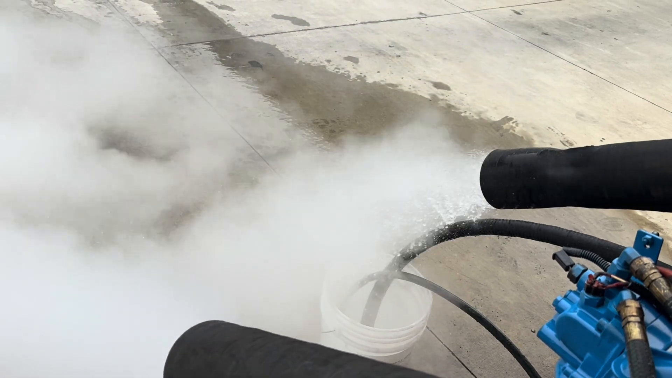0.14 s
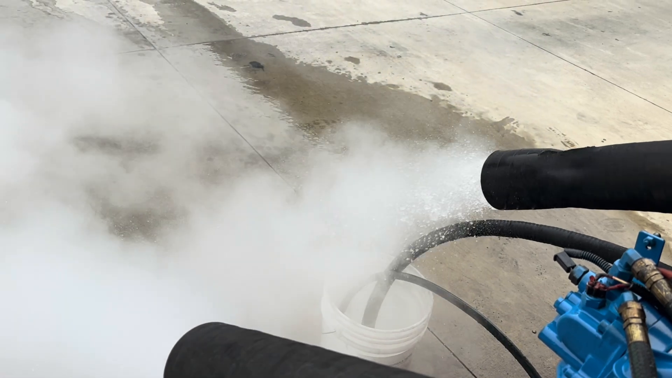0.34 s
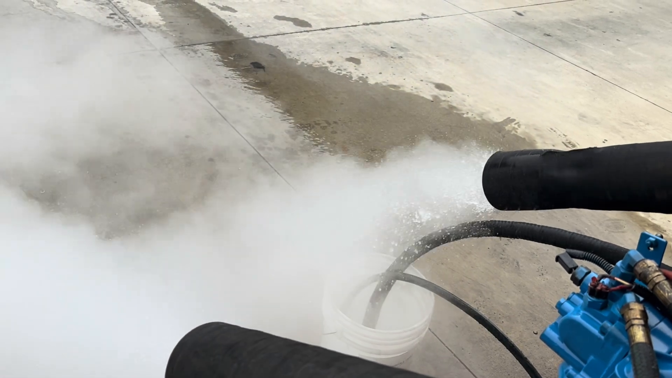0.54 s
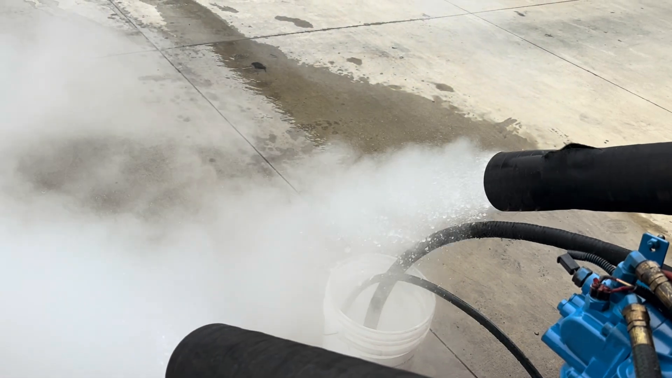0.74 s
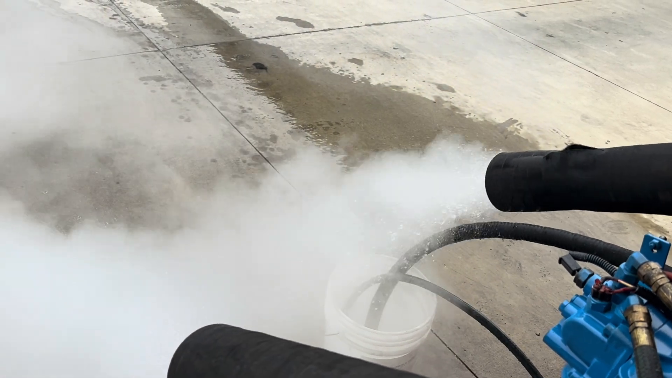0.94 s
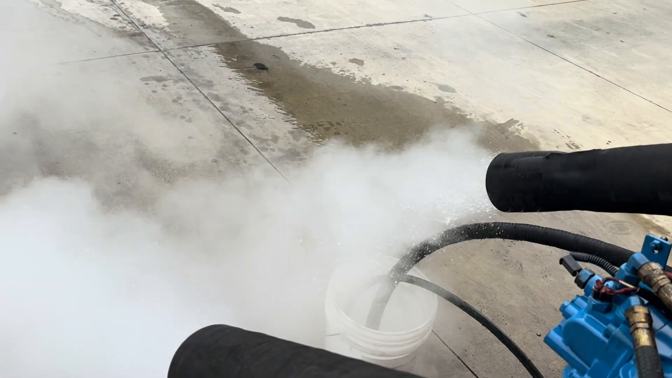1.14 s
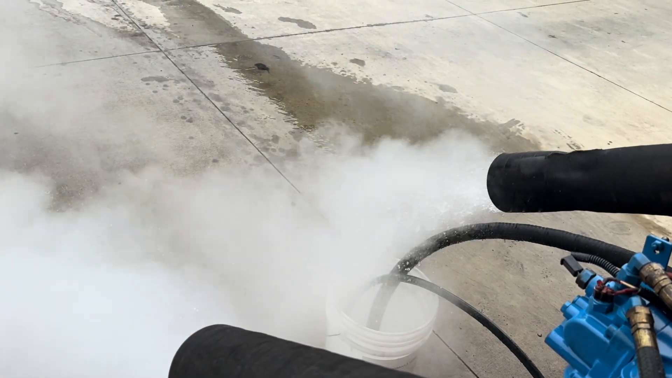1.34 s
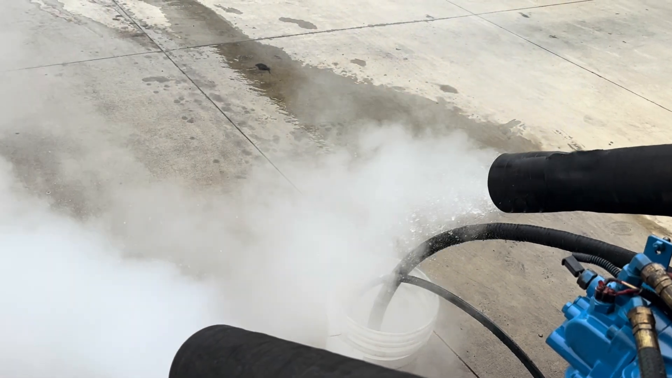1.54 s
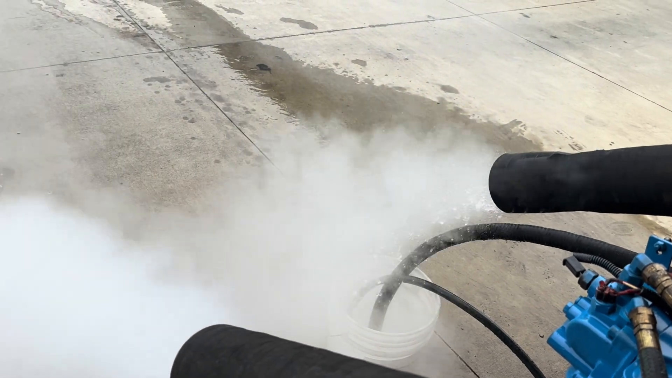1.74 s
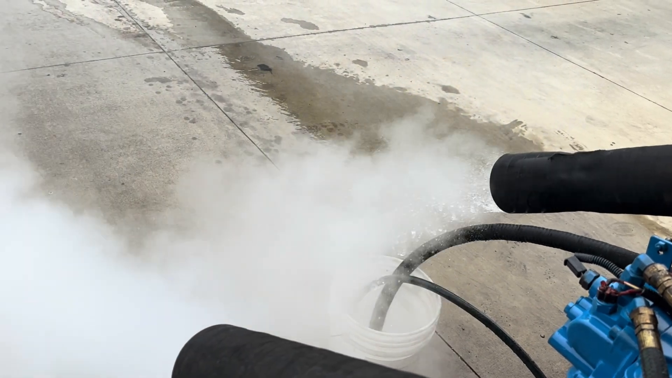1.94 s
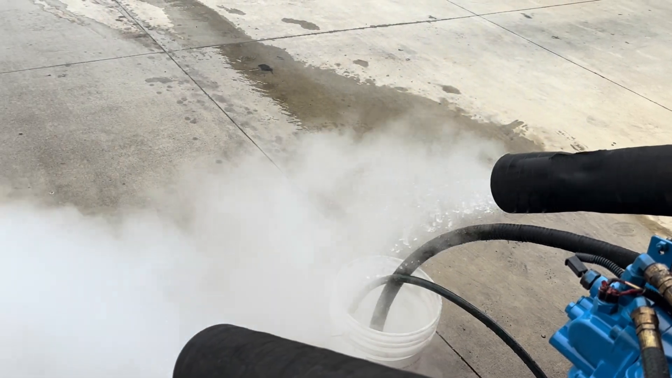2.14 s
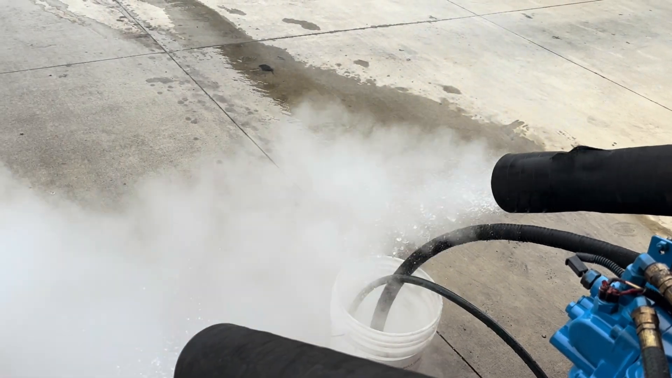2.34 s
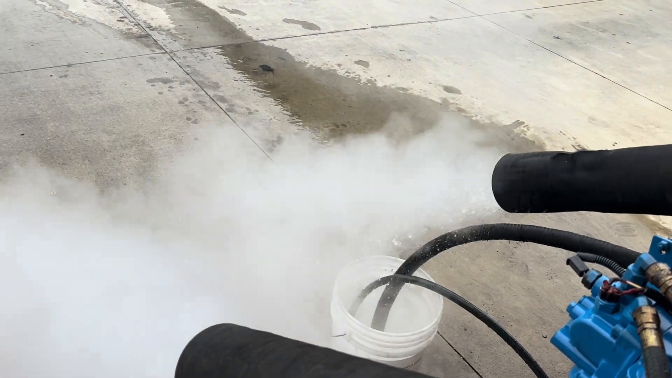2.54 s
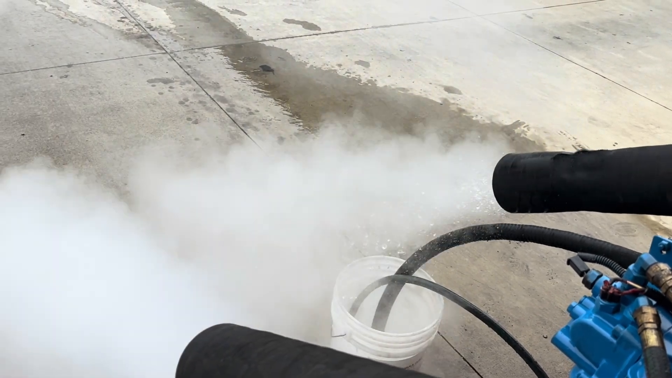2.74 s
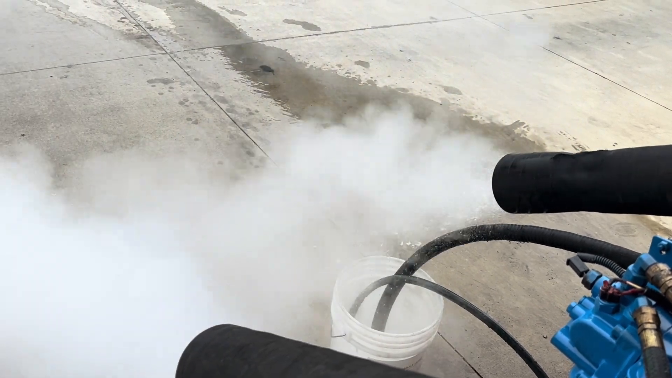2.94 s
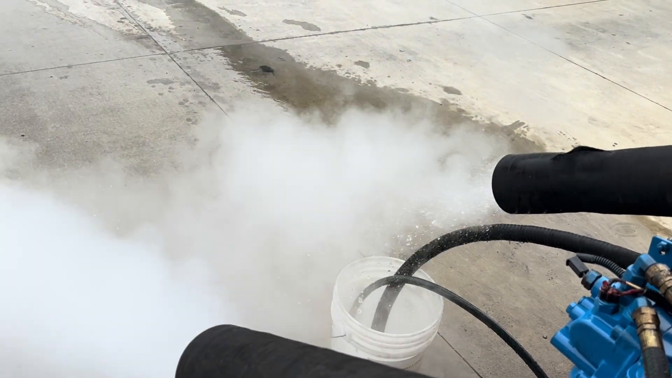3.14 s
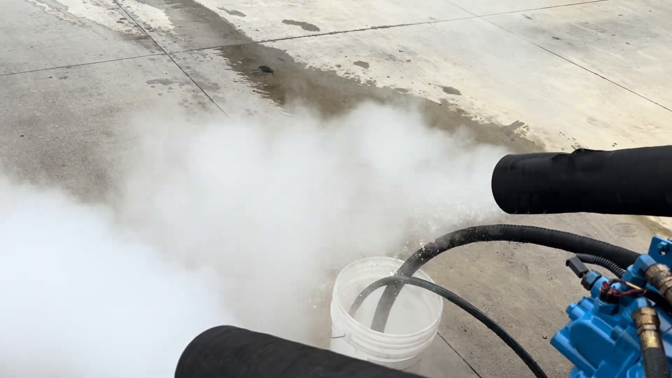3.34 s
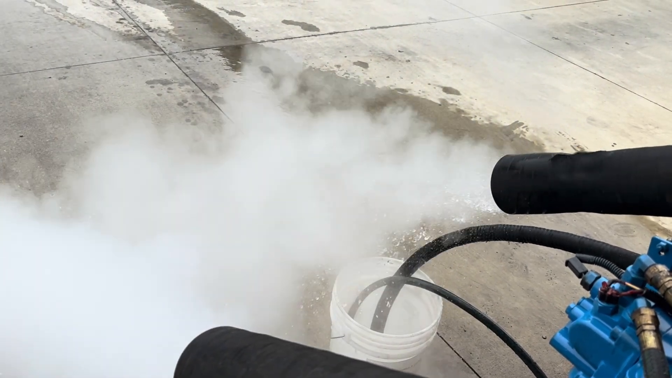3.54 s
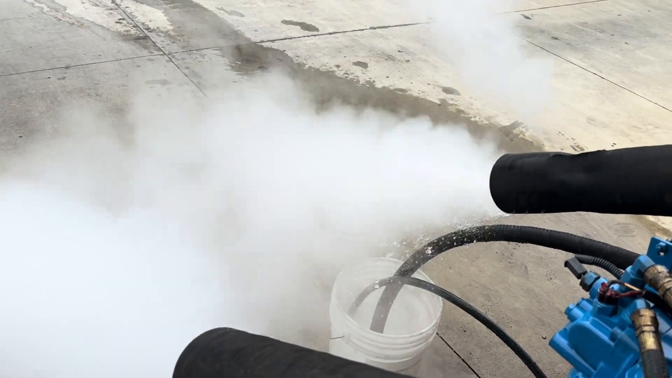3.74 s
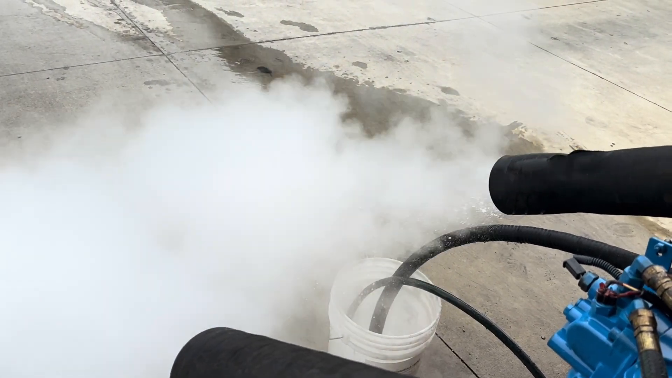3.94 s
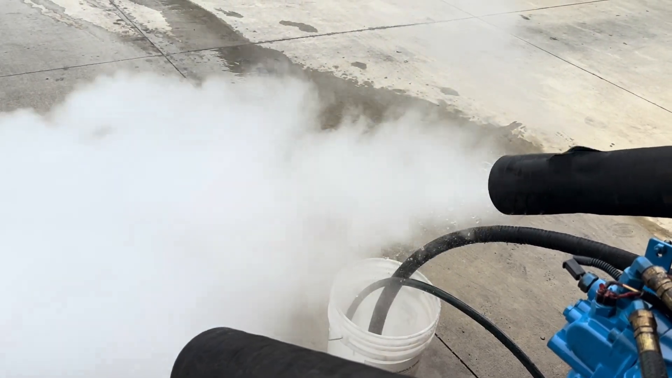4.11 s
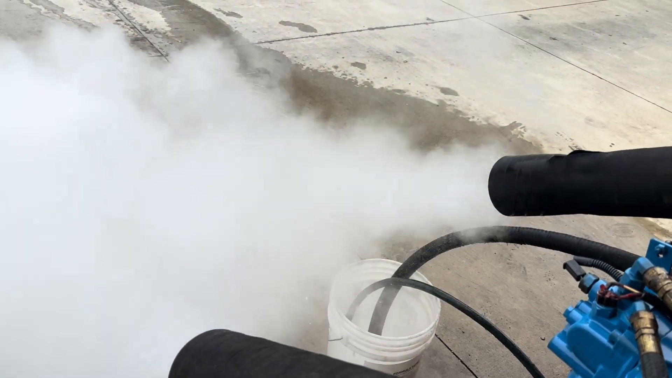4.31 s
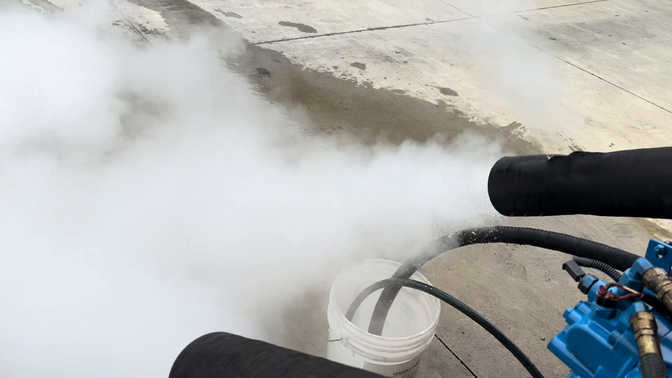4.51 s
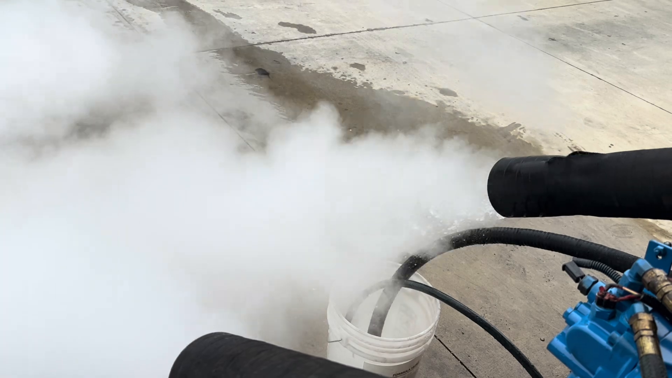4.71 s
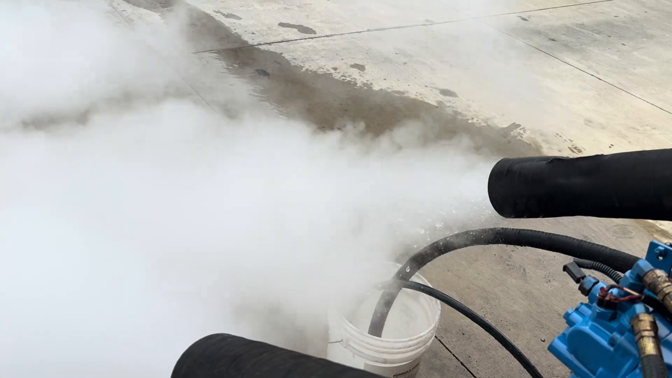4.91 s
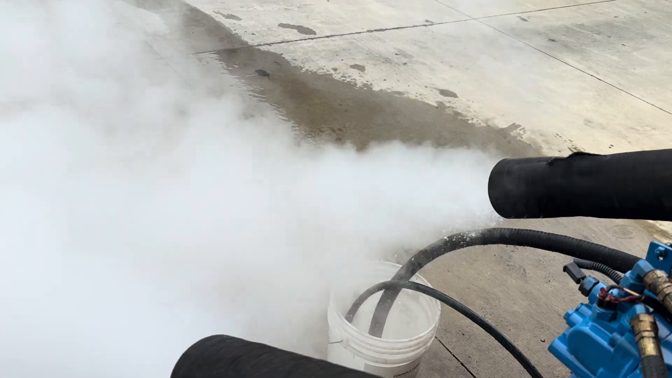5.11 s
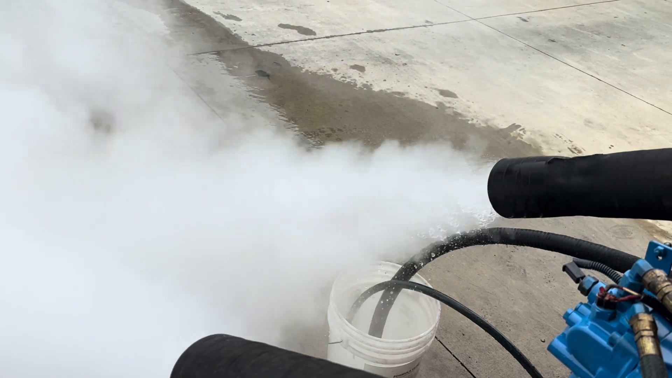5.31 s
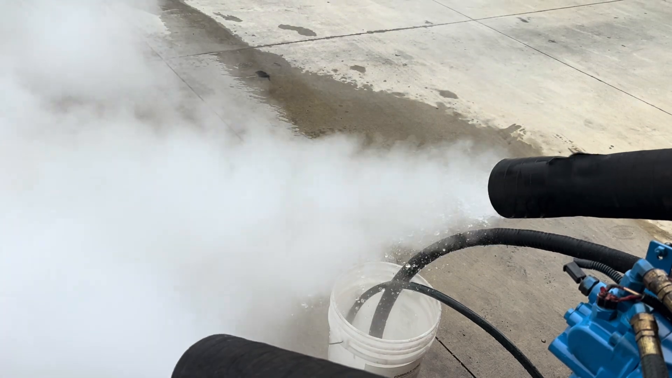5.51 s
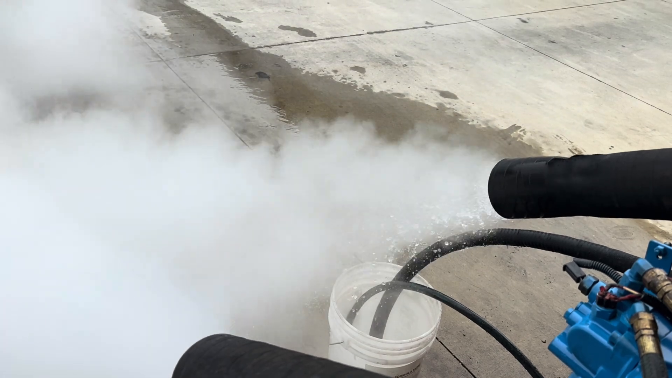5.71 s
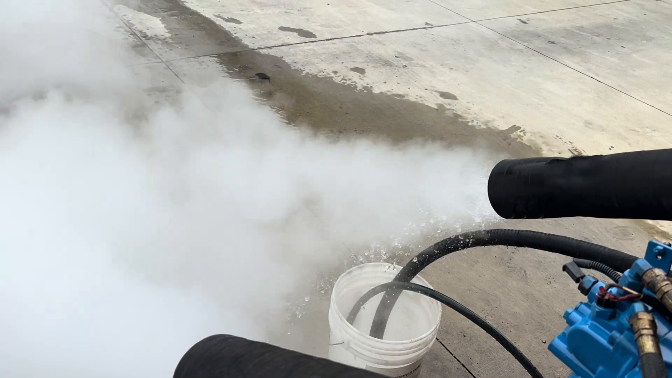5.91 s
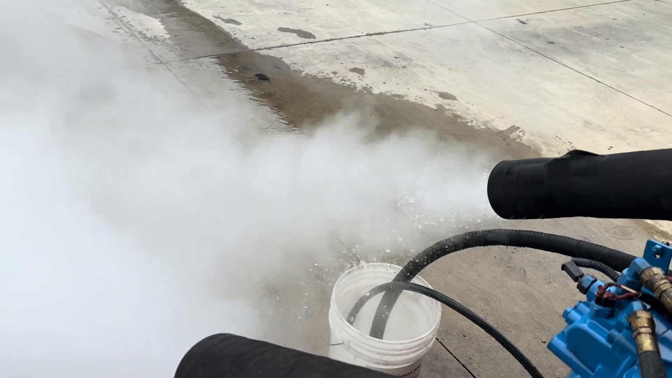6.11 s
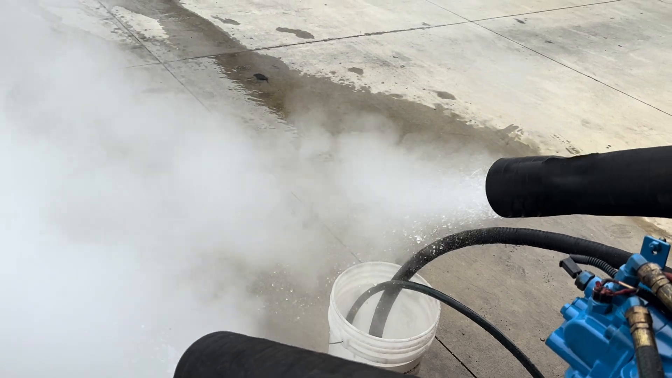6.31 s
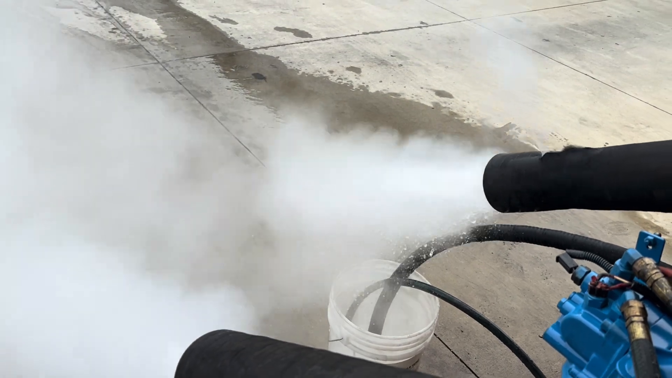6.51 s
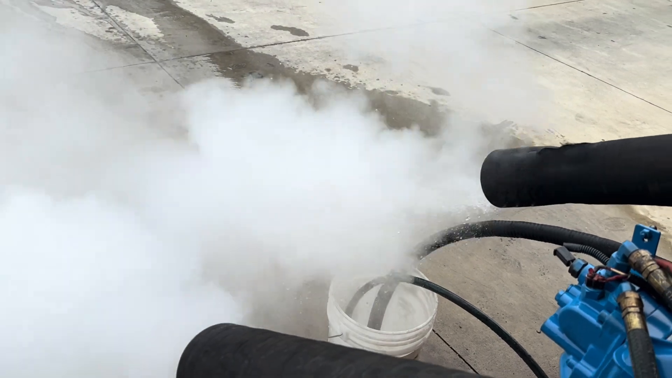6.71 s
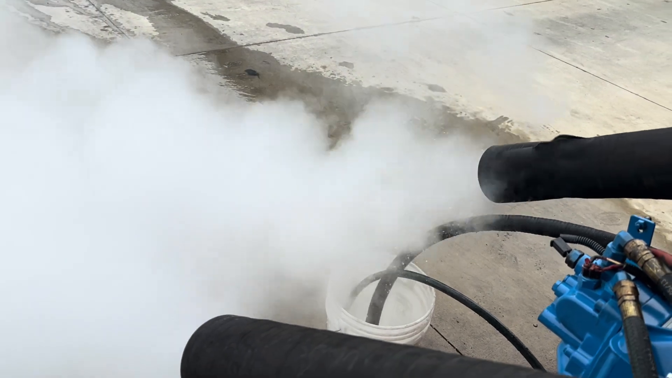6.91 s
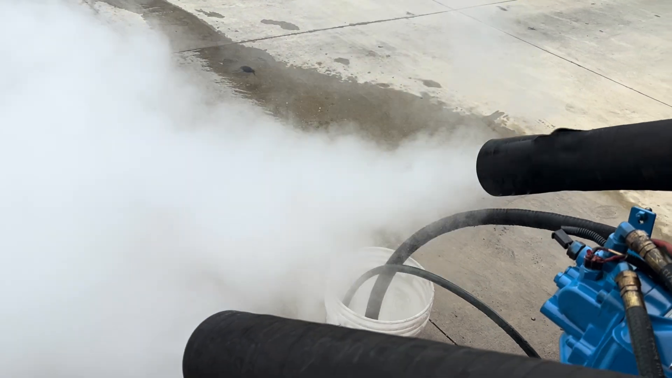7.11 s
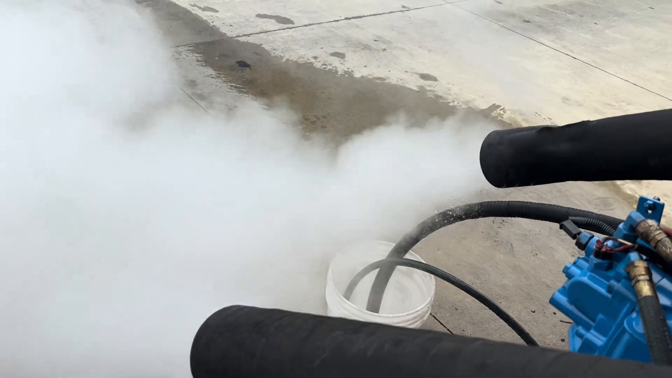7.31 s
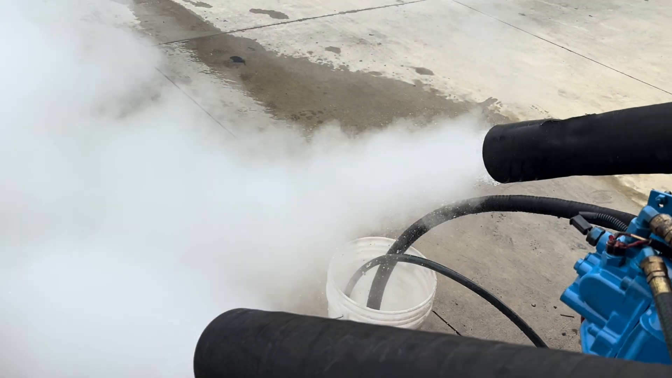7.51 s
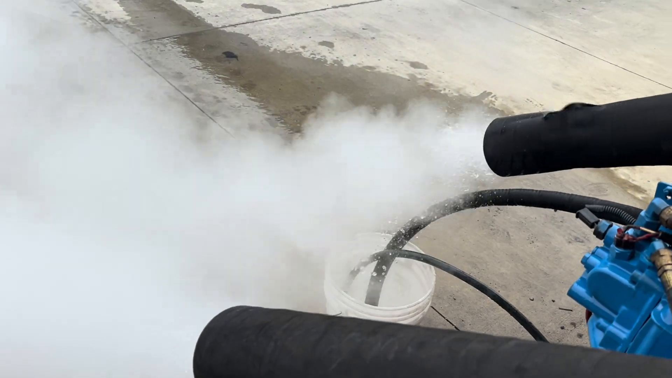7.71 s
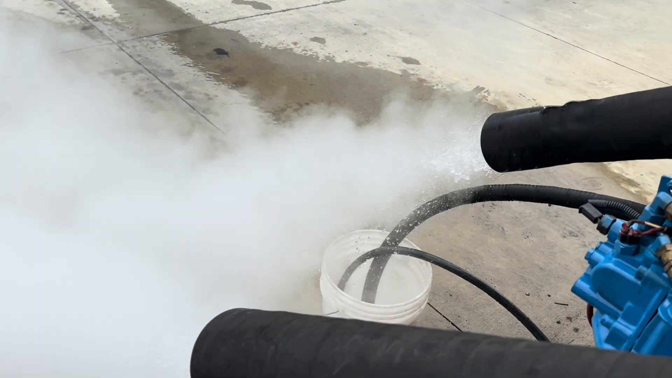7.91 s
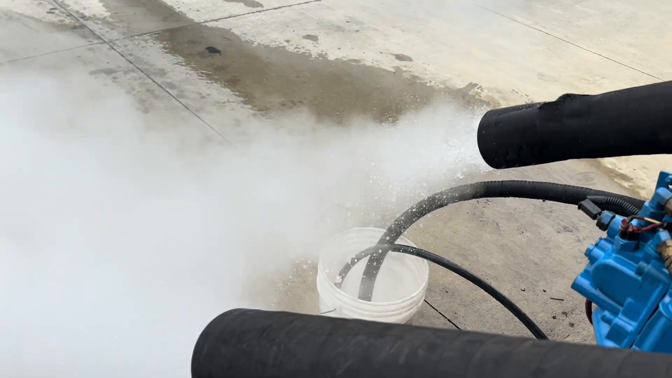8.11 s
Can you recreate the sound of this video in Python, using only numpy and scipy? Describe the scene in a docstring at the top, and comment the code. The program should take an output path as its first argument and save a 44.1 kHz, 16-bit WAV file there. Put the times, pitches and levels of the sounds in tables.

```python
"""Boat engine blipped on a stand

An eight-cylinder boat engine runs outdoors, settles to a fast idle and is blipped three times.
Its firings leave two wet rubber hoses as sines on the orders of the four-stroke cycle.
Filtered noise, pulsing at the firing rate, adds rumble, gas roar and spray hiss; short falling swings add
thumps, ringing knocks add lone firings. A two-port microphone stands close by and gives the stereo picture."""
import sys
import numpy as np
from scipy import signal
from scipy.fft import rfft, irfft, next_fast_len
from scipy.io import wavfile
from scipy.ndimage import uniform_filter1d

SR = 44100
rng = np.random.default_rng(int(sys.argv[2]) if len(sys.argv) > 2 else 0)


def dump_mix(stems):
    """Bounce the given channels to the path in sys.argv[1] as a 16-bit WAV at rate SR."""
    frames = np.atleast_2d(stems).T  # one column per channel
    limited = np.clip(frames, -1, 1)  # hard clip at full scale
    pcm = np.round(limited * 32767).astype(np.int16)
    wavfile.write(sys.argv[1], SR, pcm)


N = 359408
STEP = 8   # samples between values of the slow control curves

# Crank speed. Each row: time in seconds, speed in four-stroke cycles per second.
CRANK_SPEED = [(0, 25.0), (.5, 21.3), (1.0, 19.35), (1.5, 18.1), (1.8, 18.05), (2.25, 18.9), (2.75, 19.3),
               (3.25, 18.9), (3.57, 19.1), (3.65, 21.58), (3.86, 34.2), (3.95, 35.0), (4.26, 28.4),
               (4.34, 27.9), (4.41, 29.4), (4.6, 35.7), (4.71, 36.2), (4.93, 32.7), (5.1, 31.6),
               (5.4, 31.0), (5.98, 30.71), (6.29, 24.5), (6.38, 23.0), (6.45, 24.4), (6.5, 26.71),
               (6.7, 39.9), (6.79, 41.0), (7.2, 31.07), (7.55, 23.8), (7.85, 19.3), (8.15, 16.2)]
# Order levels of each throttle state below 725 Hz. One value per order 1, 2, 3, ..: level in dB against
# the bark, but for orders 3, 5, 6 and 8 in dB against STRONG_ORDERS.
COAST = [-47, -31, 0, -19, 1, 2, -21, 1.5, -4.5, -17, -4.5, -11, -30, -12.5, -10.5, -23, -16, -18.5, -10.5,
         -16, -50, -21, -22, -15.5, -22, -23, -28]
SETTLE = [-36, -36, -0.5, -19, 1, 1.5, -46, -2, -8.5, -6.5, -39, -12, -8.5, -8.5, -20, -7.5, -8.5, -24, -23,
          -11.5, -13, -25, -29, -7, -15, -17, -14, -14.5, -27, -22, -21, -24, -13, -14, -32, -16]
IDLE = [-37, -35, 4.5, -12, 7, 0, -20.5, 1, -1.5, -2, -9, -7.5, -12, -21, -9.5, -4.5, -26, -3.5, -7.5, -43,
        -14, -21, -23, -33, -16.5, -27, -15.5, -9, -8, -21.5, -7, -18, -34, -22, -8, -18]
PULL = [-40, -11.5, 3, -29, 1.5, -3.5, -43, 0, -12.5, -4, -10.5, -52, -11.5, -21, -10, -9, -16.5, -38, -13,
        -12, -6.5, -32, -18, -20, -9.5, -12]
BURBLE = [-28, -2, 0, -10, 0.5, -1, -10, 4.5, -14, -9, -11.5, -34, -12, -14, -16, -9.5, -14, -14, -34, -36,
          -17, -28, -30]
CRUISE = [-39, -20, 0.5, -40, 2.5, 2.5, -14, -1.5, -12.5, -28, -9, -22, -42, -16, -43, -22, -9, -25, -7.5,
          -14.5, -16.5, -16.5, -19.5]
# The same at a faster crank, where the orders sit elsewhere on the pipe resonances: one dB value per order.
FAST_COAST = [-50, -30, -0.5, -12.5, -0.5, 1.5, -13.5, 0, -12, -30, -8, -13, -10, -29, -14.5, -11.5, -10,
              -14.5, -13, -10.5, -19, -14, -21.5, -32]
FAST_SETTLE = [-37, -30, 0.5, -24, -4, 1.5, -27, 2, -6, -5, -18, -4, -7, -9, -14, -25, -25, -16, -24, -9,
               -18, -15, -25, -14, -20, -23, -15, -9.5, -30, -23, -20, -27, -16, -20]
FAST_IDLE = [-29, -27, 2, -12.5, 3, -2.5, -17, 0, -5, -2, -24, -12, -6.5, -8, -21, -7.5, -10.5, -14, -8.5,
             -31, -16.5, -24.5, -9.5, -14, -23.5, -19.5, -10.5, -10, -17, -20, -11.5, -18, -37, -10, -20,
             -15.5]
# Throttle states: coast, settle, idle, pull, burble, cruise; every "by state" table keeps this order.
# Each row: order levels in dB, upper orders in dB against the roar, roar below 1.5 kHz in dB.
STATES = [(COAST, -7, -1.5), (SETTLE, -3.5, 0), (IDLE, 0, 0), (PULL, -7.5, -2.1), (BURBLE, -1.3, -0.72),
          (CRUISE, 1.7, -3)]
# Where the faster order levels take over.
# Each row: state number, order levels in dB, first and full effect in cycles per second.
AT_SPEED = [(0, FAST_COAST, 27, 31), (1, FAST_SETTLE, 21.6, 22.2), (2, FAST_IDLE, 18.6, 19.0)]
# Throttle hand. Each row: time in seconds, number of the state entered.
THROTTLE = [(0, 2), (3.62, 3), (3.99, 0), (4.32, 3), (4.76, 4), (5.07, 5), (6.01, 0), (6.4, 3), (6.82, 0)]
# Basic cycle-to-cycle unsteadiness. One value by state: amount 0 to 1.
WOBBLE = [.13, .09, .07, .15, .3, .07]
# Usual crank speed. One value by state: cycles per second.
USUAL_SPEED = [30, 21, 18.8, 30, 33, 31]
# Running levels at the usual speed. Each row, by state: bark, roar and hiss in dB.
RUNNING_LEVELS = [(-24, -37.5, -47.5), (-26.5, -46, -56.5), (-26.5, -44, -54), (-23.5, -38.5, -51),
                  (-23.5, -36.5, -47.5), (-21, -39, -49.5)]
# How levels follow crank speed. Each row, by state: bark, roar and hiss in dB per octave.
DB_PER_OCTAVE = [(11, 16.6, 14.5), (-3.5, 14, 6), (1, 4, 3.5), (7.5, 14.6, 16), (0, 6.9, 12), (-25, 13, 5)]
# Level swells: a slight opening dip, three throttle blips, a last rise of roar at the end.
# Each row: start and end in seconds, change of bark, roar and hiss in dB.
LEVEL_SWELLS = [(-.2, 0.447, -1.5, -0.5, 0), (3.562, 3.954, 5, 19.5, 20.5), (4.306, 4.675, 3, 12, 9),
                (6.374, 6.803, 6, 17.5, 17.5), (8.076, 8.4, -4, 7, 3)]
# Fade in and out of a level swell. Three values each, for bark, roar and hiss: time in seconds.
SWELL_ATTACK_S = [0.17, 0.1, 0.1]
SWELL_RELEASE_S = [0.097, 0.17, 0.16]
# Bark, roar and hiss follow the speed late; the cooling water lags most. Three values: lag in seconds.
FLOW_LAG_S = [0.016, 0.045, 0.085]
# Strong orders swell and fade as speed carries them through the pipe resonances. One list by state.
# Each row: speed in cycles per second, orders 3, 5, 6 and 8 in dB against the bark.
STRONG_ORDERS = [
    [(16.9, 1, -5, -8, -11), (20.2, 2, -5, -1, 0.5), (22.3, 3.5, -12, -1.5, -12),
     (25.6, -0.5, -9, -3.5, -17), (26.7, 0.5, -15, -3.5, -11.5), (31.4, 2, -6.5, -6, 0.5),
     (34.2, 0, 0, -12, -3), (37.8, -1, -5.5, -9.5, -4.5)],
    [(18.5, -6, -23, -10, 5), (18.8, 0, -17, -13, 4), (20, -0.5, -11, -5, 3), (21, -1, -10, -3.5, 4),
     (23, -1.5, -9, 3.5, -7), (26.1, 3, -28, 9.5, -4)],
    [(18.1, -14, -12, -20, 6.5), (18.9, -9.5, -10, -5, 10), (19.3, -6, -6.5, -11.5, 10.5)],
    [(23, -37, -3, -11, 12.5), (25.9, 1, -9, 0, 6), (27.8, -11.5, -4, -3, 5.5), (32.2, -8, -2.5, -10.5, 0),
     (34.8, -16, 4, 1, -6.5), (38.9, -11, -1, -3, -16), (41.4, -19, 0, 0, -4.5)],
    [(31.4, -6.5, -11, -4.5, -3), (35, -4.5, 2.5, 1.5, -21.5)],
    [(31, -6.5, -8, -4, -4)],
]
# Upper orders, above 725 Hz. Each row: frequency in Hz, level of one order in dB.
UPPER_ORDERS = [(725, -14.5), (930, -15), (1200, -22.5), (1400, -29.5), (1700, -38), (2700, -29)]
# Single upper orders at idle, from order 38 up. One value per order: dB against UPPER_ORDERS.
UPPER_IDLE_DB = [5.5, -19, -5.5, 0, -2, 1.5, -3.5, -3, -10.5, -10.5, 10.5, -1.5, 1.5, -12, -12, -1.5, 5,
                 9.5, -5, 6.5, -3.5, -10, -7, -3, 0, 2, -10.5]
# Single upper orders at held revs, from order 24 up. One value per order: dB against UPPER_ORDERS.
UPPER_CRUISE_DB = [-9, 6.5, 0, -7, 2, -5, -2, -13, 0, 10, 1, -1, 10, -8, 4.5, 6, -1, -3, 0, -2]
# Uneven suction pulses that the near bank draws off load. Each row: eighth of the cycle, strength.
BANK_PULSES = [(1.7, .85), (2.7, 1), (4.7, .85), (7.7, .85)]
# Hard knocks into which the upper orders gather, at idle and at held revs.
# Each row: eighth of the cycle, strength.
IDLE_KNOCKS = [(0, .7), (1.3, .4), (3.8, .7), (5.9, 1)]
CRUISE_KNOCKS = [(.3, 1), (6.8, .4)]
# Puff strength of the cylinders. One value in firing order: dB before the puffs are levelled together.
CYLINDER_DB = [5.5, -1, -12, -6, 1, -0.5, 6.5, -0.5]
# Rumble colour. Each row: frequency in Hz, relative level in dB per Hz.
RUMBLE_COLOUR = [(30, -45.5), (55, 2), (100, -5), (170, 0), (330, -5.5), (520, -0.5), (600, -9.5),
                 (690, -5), (780, -32), (1000, -82)]
# Rumble level. One value by state: dB against the bark.
RUMBLE_DB = [-12, -13, -18, -8, -3.5, -12]
# Outflow alike in both ports; the port spacing cancels near 10 kHz.
# Each row: frequency in Hz, relative level in dB per Hz.
JET_MID = [(440, -12.5), (740, 5), (1150, -1.5), (1300, -4.5), (1750, -5.5), (2350, -11), (3400, -16.5),
           (4500, -18), (8000, -18.5), (9100, -22), (10000, -62), (11400, -23), (14000, -26.5),
           (15500, -37)]
# Outflow opposite in the ports. Each row: frequency in Hz, relative level in dB per Hz.
JET_SIDE = [(440, -28), (740, 7), (1330, -5), (1540, -6), (1810, -5), (2350, -13), (7210, -18),
            (10800, -17), (12400, -24), (16100, -62)]
# Tearing at the hose mouth, about 3 to 5.5 kHz. One value by state: dB against the hiss.
RASP_DB = [-2.5, 0, 0, 4.5, 0, 0]
# The hoses lift some bands and hollow out others. Each row: centre in Hz, half-width in Hz,
# level change in dB.
HOSE_BANDS = [(488, 14, 3), (619, 23.5, -10), (743, 67, -5.5), (887, 18, 3), (1185, 12, 5.5),
              (1411, 39, 7.5), (1616, 26, 4.5), (1805, 55, 1), (2203, 14, 8), (2400, 27, 8.5),
              (2920, 300, 3.5)]
# Stereo lean. Each row: frequency in Hz, left minus right in dB.
LEAN = [(60, 1.5), (110, 4.5), (200, 0), (380, 2.5), (700, 3.5), (1290, 1.5), (2380, 2.5), (4400, 7.5),
        (8120, 2), (15000, -2)]
# Phase between the two hoses. Each row: frequency in Hz, turns by which right lags left.
SECOND_HOSE = [(200, 0.014), (700, 0.16)]
# The gas column slaps back as the throttle shuts. Each row: time in seconds, swing level in dB,
# sweep setting in Hz (the swing starts at about 0.55 of it plus 35 Hz), spit of spray in dB.
THUMPS = [(3.988, -16, 108, -50), (6.81, -14, 129, -35.5)]
# Lone firings as the coasting engine falls back to and below idle speed.
# Each row: time in seconds, level in dB, lower ring in Hz.
PUTTS = [(7.855, -25, 283), (7.938, -22, 144), (7.982, -25, 288), (8.04, -26.5, 285), (8.102, -20.5, 277)]

PUTT_DECAY_S = 0.014
SIDE_DB, RUMBLE_SIDE_DB = -3.5, -6   # side against mid, outflow and rumble
SURGE_DB, CRUISE_SURGE_DB = 1, -1   # once-a-cycle swing of the roar under load and at held revs
TEAR_DB = 1   # under load each band of the outflow tears into patches of its own
LUMPY_BELOW_HZ, LUMPY_DB_PER_OCTAVE = 30, 6   # coasting under this many cycles per second, the rumble grows
CRANK_WANDER_TURNS = .008   # the crank hunts about its mean speed
UPPER_FROM_HZ, ORDERS = 725, 64
SETTLED_HZ = 21.5   # cycles per second above which the crank is still dropping to idle
CUTOFF_HZ = 15560


def from_db(db):
    """Decibels to gain."""
    return 10 ** (np.asarray(db) / 20)


def rms_one(x):
    """Scale to unit rms."""
    return x / np.sqrt(np.mean(x ** 2) + 1e-20)


def at_hz(points, hz):
    """Read a table on a log-frequency axis."""
    table_hz, values = np.array(points).T
    return np.interp(np.log(hz + 1e-3), np.log(table_hz), values)


def drift(rate, count):
    """Slow random curves of spread 1, at control rate: noise through two poles at rate Hz."""
    r = np.exp(-2 * np.pi * rate * STEP / SR)
    noise = rng.standard_normal((count, N // STEP + 2001))
    slow = signal.lfilter([1], [1, -2 * r, r * r], noise)[:, 2000:]
    return slow / slow.std(axis=1, keepdims=True)


def full_rate(x):
    """From one value every STEP samples to every sample."""
    return signal.resample_poly(x, STEP, 1, axis=-1, padtype="edge")[..., :N]


def coloured(x, db_at):
    """Filter by a level given as a function of frequency."""
    size = next_fast_len(N)
    hz = np.arange(size // 2 + 1) * SR / size
    return irfft(rfft(x, size) * from_db(db_at(hz)), size)[..., :N]


def pulses_at(rows, k):
    """Order k of pulses placed at eighths of the cycle, as a unit phasor."""
    total = sum(strength * np.exp(-2j * np.pi * k * eighth / 8) for eighth, strength in rows)
    return total / abs(total)


def hose_db(hz):
    """The hoses lift some bands and hollow out others."""
    return sum(db / (1 + ((hz - centre_hz) / width) ** 2) for centre_hz, width, db in HOSE_BANDS)


def state_shares(t, fade_s):
    """Share of each throttle state over time, cross-faded."""
    starts, rows = np.transpose(THROTTLE)
    now = rows[np.searchsorted(starts, t, side="right") - 1]
    shares = np.array([now == k for k in range(len(STATES))], float)
    shares[1] = np.clip((1.5 - t) / .8, 0, 1)      # the first idle settles gradually
    shares[2] -= shares[1]
    return uniform_filter1d(shares, int(fade_s * SR / STEP), axis=1)


def exhaust_levels(t, cycle_hz, shares):
    """Bark, roar and hiss in dB: the state's running level, moved by speed and by the level swells."""
    late_hz = np.array([np.interp(t - lag_s, t, cycle_hz) for lag_s in FLOW_LAG_S])
    octaves = np.log2(late_hz / (np.array(USUAL_SPEED) @ shares))
    slopes = np.transpose(DB_PER_OCTAVE) @ shares
    levels = np.transpose(RUNNING_LEVELS) @ shares + slopes * octaves
    attack_s, release_s = np.array(SWELL_ATTACK_S)[:, None], np.array(SWELL_RELEASE_S)[:, None]
    for start, end, *db in LEVEL_SWELLS:
        ramp = np.clip(np.minimum((t - start) / attack_s, (end - t) / release_s), 0, 1)
        levels += np.array(db)[:, None] * ramp
    return levels


def strong_orders(cycle_hz, shares):
    """Orders 3, 5, 6 and 8 against the bark, read at the crank speed and blended over the states."""
    out = 0
    for rows, share in zip(STRONG_ORDERS, shares):
        speed, *columns = np.transpose(rows)
        out = out + share * np.array([np.interp(cycle_hz, speed, c) for c in columns])
    return out


def firing_gate(turns, depth):
    """A decaying puff at each of eight firings a cycle, its strength set by cylinder and by chance."""
    firing = (8 * turns + 0.5).astype(int)
    chance_db = rng.normal(0, 4, 4000)[firing]
    strength = from_db(chance_db + np.array(CYLINDER_DB)[firing % 8])
    puff = rms_one(strength * np.exp(-2.2 * ((8 * turns + 0.25) % 1)))
    depth = np.clip(depth, 0, 1)
    return (1 - depth + depth * puff) / np.sqrt(1 - 0.15 * depth * (1 - depth))


def chuffs():
    """A last spit of spray just before the throttle shuts: a brief swell of band-passed noise."""
    t = np.arange(N) / SR
    band = signal.butter(2, [3500, 6500], "band", fs=SR, output="sos")
    noise = signal.sosfilt(band, rng.standard_normal((2, N)))
    swells = sum(from_db(db) * np.exp(-((t - s + .002) / 0.024) ** 2) for s, _, _, db in THUMPS)
    return rms_one(noise) * swells


def putts():
    """A lone firing knocks the hose: two short rings."""
    out, t = np.zeros(N + SR), np.arange(SR // 10) / SR
    for s, db, hz in PUTTS:
        ring = np.sin(2 * np.pi * hz * t) + 0.7 * np.sin(2 * np.pi * 1.66 * hz * t)
        out[int(s * SR):int(s * SR) + len(t)] += from_db(db) * ring * np.exp(-t / PUTT_DECAY_S)
    return out[:N]


def thumps():
    """The gas column slaps back: short low swings that fall in pitch."""
    out, t = np.zeros(N), np.arange(SR // 6) / SR
    envelope = (1 - np.exp(-t / 0.0018)) * np.exp(-t / 0.028)
    for s, db, hz, _ in THUMPS:
        fall = hz * 0.021 * (1 - np.exp(-t / 0.038))      # turns gained while the pitch sinks towards 35 Hz
        swing = np.sin(2 * np.pi * fall + 2 * np.pi * 35 * t)
        out[int(s * SR):int(s * SR) + len(t)] += from_db(db) * swing * envelope
    return out


def jet(roar_gate, hiss_gate, roar_db, hiss_db, shares):
    """The outflow: gas roar below 3 kHz and, above, spray that faintly crackles and rasps more under load."""
    drop_size = from_db(2.6 * np.minimum(rng.exponential(1, N), 5))
    drops = drop_size * (rng.random(N) < 4000 / SR) * rng.choice([-1, 1], N)      # about 4000 drops a second
    white = rng.standard_normal((2, N)) + 0.14 * rms_one(drops)
    white[1] += 0.069 * np.roll(white[0], 3)      # part of the side is the same wave reaching one port later
    mid = rms_one(coloured(white[0], lambda hz: at_hz(JET_MID, hz) + hose_db(hz)))
    side = from_db(SIDE_DB) * rms_one(coloured(white[1], lambda hz: at_hz(JET_SIDE, hz) + hose_db(hz)))
    left = coloured(mid + side, lambda hz: .5 * at_hz(LEAN, hz))
    right = coloured(mid - side, lambda hz: -.5 * at_hz(LEAN, hz))
    both = np.array([left, right])

    low, to_3k, to_5k = [coloured(both, lambda hz: -20 * np.log10(1 + (hz / edge) ** 6))
                         for edge in (1500, 3000, 5500)]
    middle, rasp, high = to_3k - low, to_5k - to_3k, both - to_5k      # the four bands add up to the whole
    gusts = drift(35.0, count=5)
    tears = from_db(TEAR_DB * shares[3] * drift(45.0, count=4))
    low, middle, rasp, high = [band * full_rate(tear)
                               for band, tear in zip((low, middle, rasp, high), tears)]
    roar_size, hiss_size = (low + middle).mean(0).std(), (rasp + high).mean(0).std()

    low_db = np.array([s[2] for s in STATES]) @ shares + 0.29 * gusts[1]
    roar = full_rate(from_db(low_db)) * low + full_rate(from_db(1.2 * gusts[2])) * middle
    roar *= roar_gate * full_rate(from_db(roar_db + 1.12 * gusts[0])) / roar_size
    rasp_db = np.array(RASP_DB) @ shares + 1.1 * gusts[3]
    hiss = full_rate(from_db(rasp_db)) * rasp + full_rate(from_db(0.88 * gusts[4])) * high
    hiss *= hiss_gate * full_rate(from_db(hiss_db + 0.5 * gusts[0])) / hiss_size
    return roar + hiss


def rumble(gate, level_db):
    """Gas and water churning in the hoses fill in between the orders: pulsing low noise."""
    noise = rng.standard_normal((2, N)) * gate
    mid, side = coloured(noise, lambda hz: at_hz(RUMBLE_COLOUR, hz))
    side = from_db(RUMBLE_SIDE_DB) * rms_one(side)
    return full_rate(from_db(level_db)) * (rms_one(mid) + side * [[1], [-1]])


def order_phase(k, hz, upper, scatter, shares):
    """Phase of order k in turns: a weak cylinder then a strong one, one bank's pulses off load, or knocks."""
    off_load, idling, cruising = shares[0], shares[1] + shares[2], shares[5]
    gap_then_kick = np.angle(.75 * np.exp(-2j * np.pi * k / 8) - 1) / (2 * np.pi) * (k % 8 > 0)
    kick = np.exp(2j * np.pi * (gap_then_kick - k / 16))
    firing = np.angle((1 - off_load) * kick - off_load * pulses_at(BANK_PULSES, k)) / (2 * np.pi)
    ringing = -np.arctan2(40, 520 - hz) / (2 * np.pi)      # the hose rings on near 520 Hz
    # each higher order gets its own random phase, so the firings sound less clicky
    spread = min(1, (k / 32) ** 2) * scatter * (k != 8)
    loose_phasor = np.exp(2j * np.pi * (firing + ringing + spread))
    knocks = idling * pulses_at(IDLE_KNOCKS, k) + cruising * pulses_at(CRUISE_KNOCKS, k)
    gathered = (1 - upper * (idling + cruising)) * loose_phasor + upper * knocks
    return np.angle(gathered) / (2 * np.pi)


def exhaust_orders(turns, cycle_hz, main_db, bark_db, roar_db, shares):
    """The firings repeat each four-stroke cycle, so they sound as sines at whole multiples of its rate."""
    def per_order(levels):
        return np.pad(levels, (0, ORDERS - len(levels)), mode="edge")

    tables = np.array([per_order(s[0]) for s in STATES], float)
    faster = [(row, per_order(fast), shares[row] * np.clip((cycle_hz - low) / (high - low), 0, 1))
              for row, fast, low, high in AT_SPEED]
    idling, cruising = shares[1] + shares[2], shares[5]
    upper_db = roar_db + np.array([s[1] for s in STATES]) @ shares
    idle_db, cruise_db = np.pad(UPPER_IDLE_DB, (37, 0)), np.pad(UPPER_CRUISE_DB, (23, 21))
    wobble = np.array(WOBBLE) @ shares
    wobble *= np.maximum(1, 26 / cycle_hz) ** (1.3 * shares[0])      # a slow coasting crank runs lumpier
    wobble += .28 * shares[1] * np.clip(cycle_hz - SETTLED_HZ, 0, 1)      # so does one dropping to idle
    swell, slip = drift(9, count=ORDERS), drift(5, count=ORDERS)
    scatter, uneven_db = rng.uniform(-.5, .5, ORDERS), rng.normal(0, 2.5, ORDERS)

    out = np.zeros((2, len(turns)))
    for k in range(1, ORDERS + 1):
        i = k - 1
        hz = k * cycle_hz
        db = main_db.get(k, bark_db) + tables[:, i] @ shares
        db += sum(share * (fast[i] - tables[row, i]) for row, fast, share in faster)
        upper = np.clip((hz - UPPER_FROM_HZ) / 30, 0, 1)
        chance_db = (1 - idling) * uneven_db[i] * (k > 43 or 1 - cruising)
        single_db = chance_db + idling * idle_db[i] + cruising * cruise_db[i]
        db += upper * (upper_db + at_hz(UPPER_ORDERS, hz) + single_db - db)
        db += hose_db(hz)
        loose = wobble * np.sqrt(k / 8)      # high orders feel timing scatter more
        size = np.sqrt(2) * from_db(db + 6 * loose * swell[i])
        settled = order_phase(k, hz, upper, scatter[i], shares)
        phase = k * turns + settled + .25 * loose * slip[i]
        for side, sign in enumerate((.5, -.5)):
            lean = from_db(sign * at_hz(LEAN, hz))
            out[side] += size * lean * np.cos(2 * np.pi * (phase + sign * at_hz(SECOND_HOSE, hz)))
    return full_rate(out)


def scene():
    """Orders, rumble and outflow driven by one crank, with thumps, spits and lone firings on top."""
    t = np.arange(N // STEP + 1) * STEP / SR
    cycle_hz = np.interp(t, *np.transpose(CRANK_SPEED))
    cycle_hz = uniform_filter1d(cycle_hz, SR // STEP // 25, mode="nearest")      # the flywheel rounds the corners
    turns = .86 + np.cumsum(cycle_hz) * STEP / SR + CRANK_WANDER_TURNS * drift(2.97, count=1)[0]
    crank = np.interp(np.arange(N) / STEP, np.arange(len(t)), turns)
    shares = state_shares(t, fade_s=0.034)
    bark_db, roar_db, hiss_db = exhaust_levels(t, cycle_hz, shares)

    main_db = dict(zip((3, 5, 6, 8), bark_db + strong_orders(cycle_hz, shares)))
    orders = exhaust_orders(turns, cycle_hz, main_db, bark_db, roar_db, shares)

    octaves_slow = np.log2(np.maximum(1, LUMPY_BELOW_HZ / cycle_hz))
    rumble_db = bark_db + np.array(RUMBLE_DB) @ shares
    rumble_db += LUMPY_DB_PER_OCTAVE * shares[0] * octaves_slow
    rumble_db += 10 * shares[1] * np.clip(cycle_hz - SETTLED_HZ, 0, 1)      # still dropping to idle
    # coasting below 22 cycles per second, the rumble comes in separate puffs
    slow_coast = shares[0] * np.clip(2 * np.log2(22 / cycle_hz), 0, .6)
    churn = rumble(firing_gate(crank, 0.12 + full_rate(slow_coast)), rumble_db)

    load, held = full_rate(shares[3]), full_rate(shares[5])
    surge = from_db(SURGE_DB * load * np.cos(2 * np.pi * (crank - .58)))
    surge *= from_db(CRUISE_SURGE_DB * held * np.cos(2 * np.pi * (crank - .04)))
    # under load the outflow breaks into hard bursts
    roar_gate = surge * firing_gate(crank, 0.028 + .2 * load)
    hiss_gate = firing_gate(crank, 0.086 + .1 * load)
    outflow = jet(roar_gate, hiss_gate, roar_db, hiss_db, shares)
    return orders + churn + outflow + thumps() + chuffs() + putts()


def record(dry):
    """The microphone drops the deepest bass; peaks are rounded and the top is cut."""
    dry = signal.sosfilt(signal.butter(2, 30, "high", fs=SR, output="sos"), dry)
    rounded = 1.2 * np.tanh(dry / 1.2)
    return signal.sosfilt(signal.ellip(12, .5, 80, CUTOFF_HZ, fs=SR, output="sos"), rounded)


dry = scene()
out = record(dry)
dump_mix(out)
```